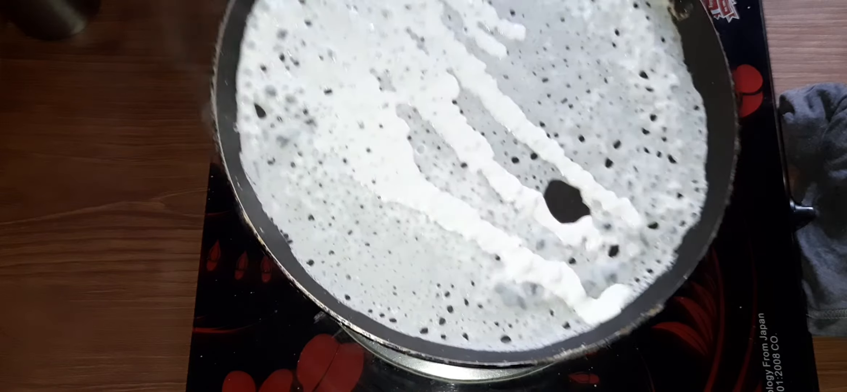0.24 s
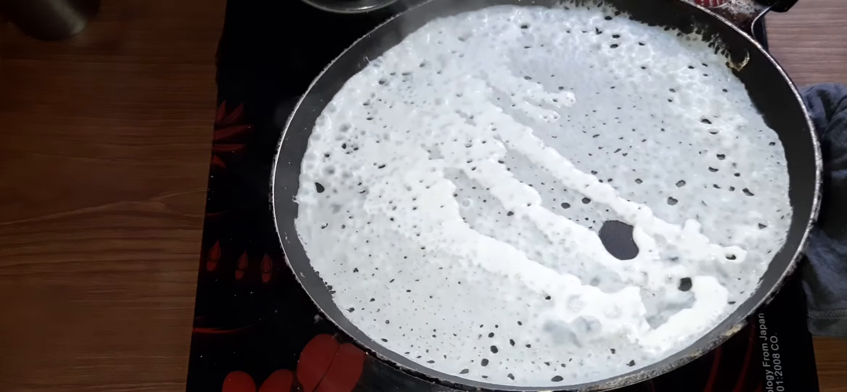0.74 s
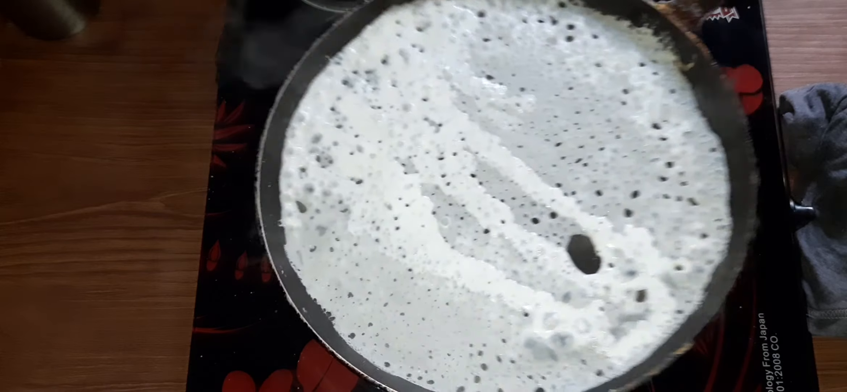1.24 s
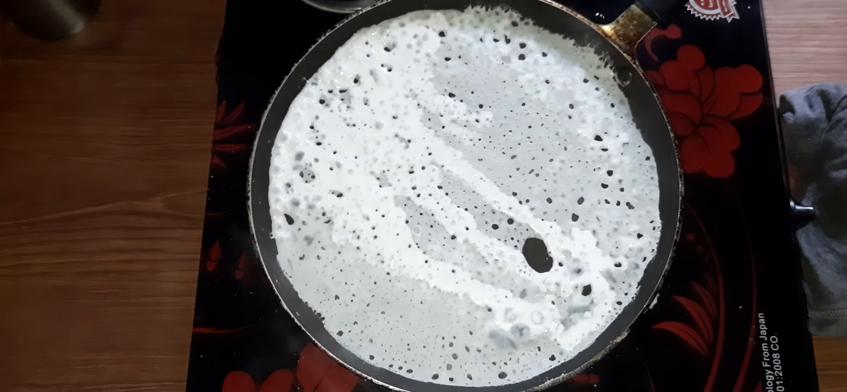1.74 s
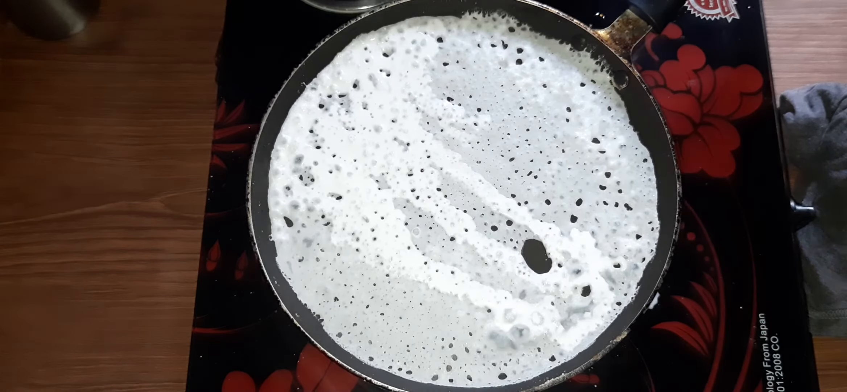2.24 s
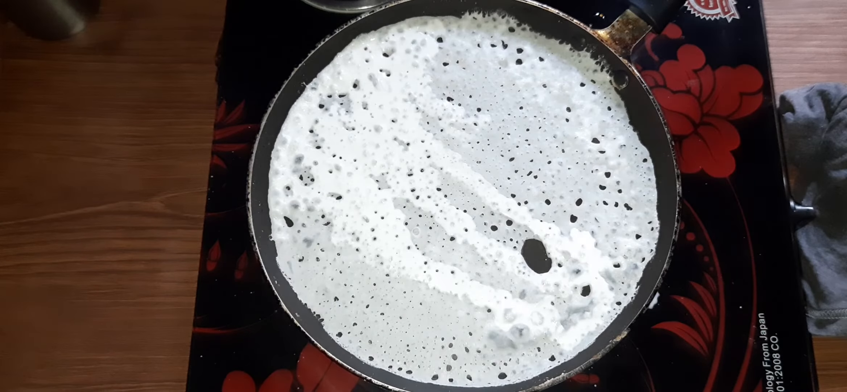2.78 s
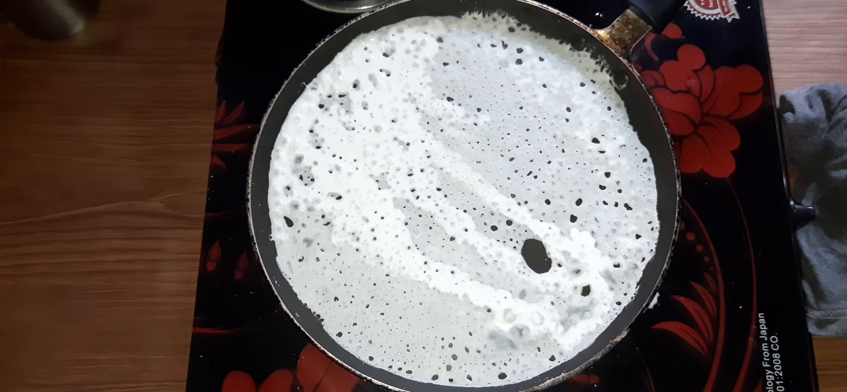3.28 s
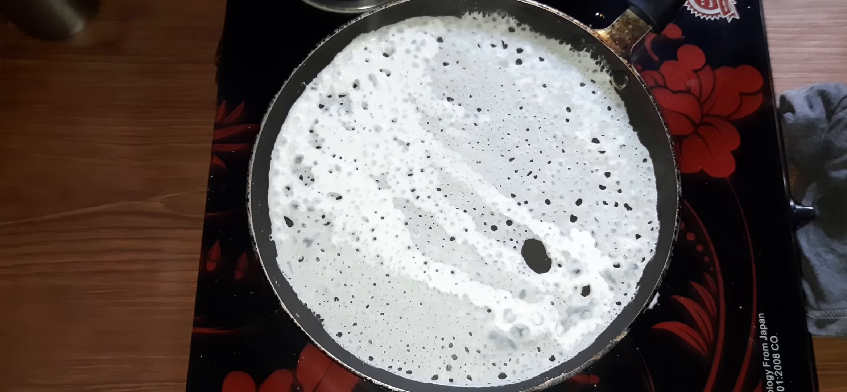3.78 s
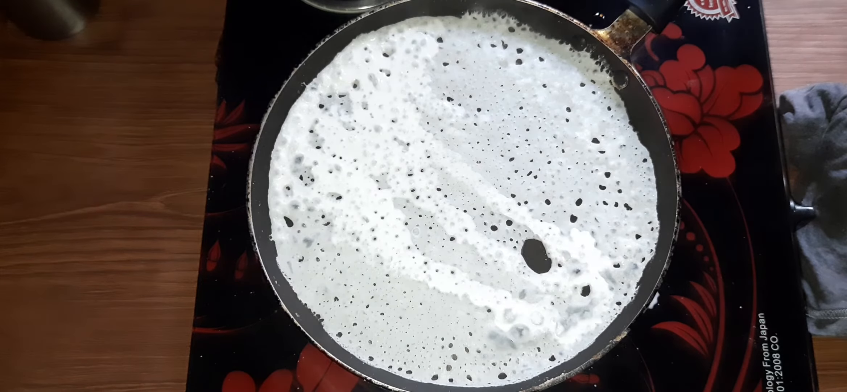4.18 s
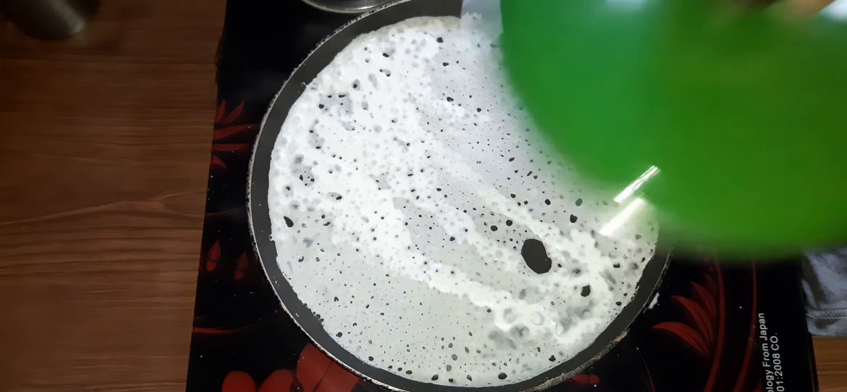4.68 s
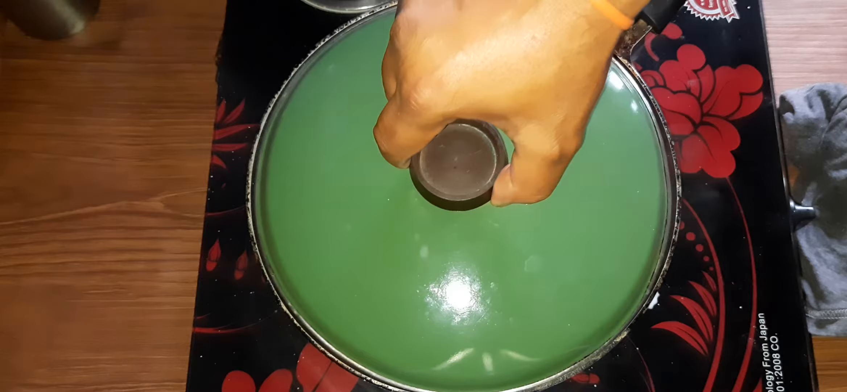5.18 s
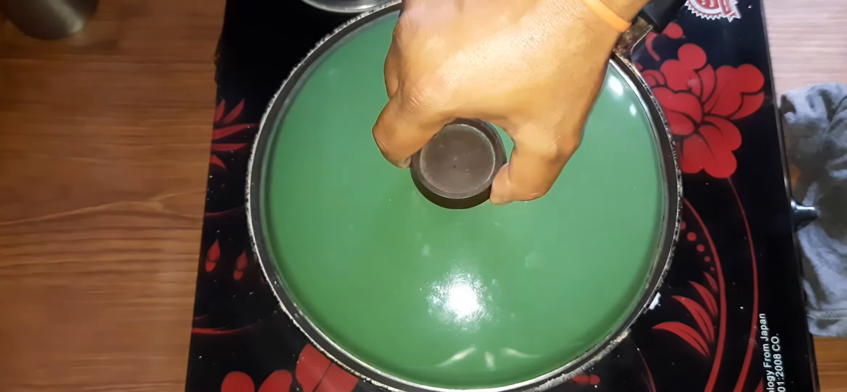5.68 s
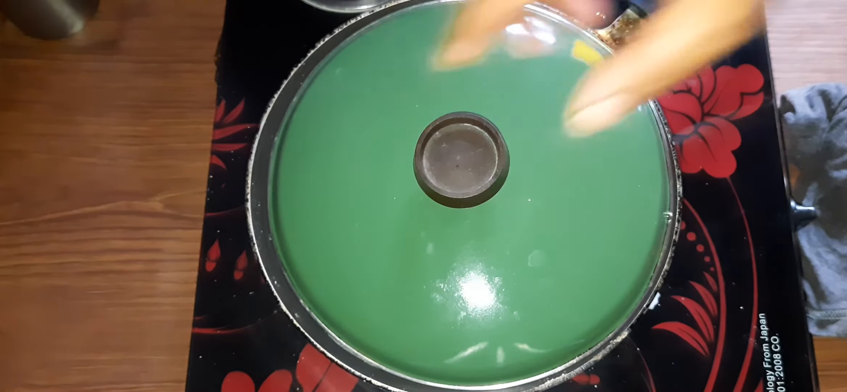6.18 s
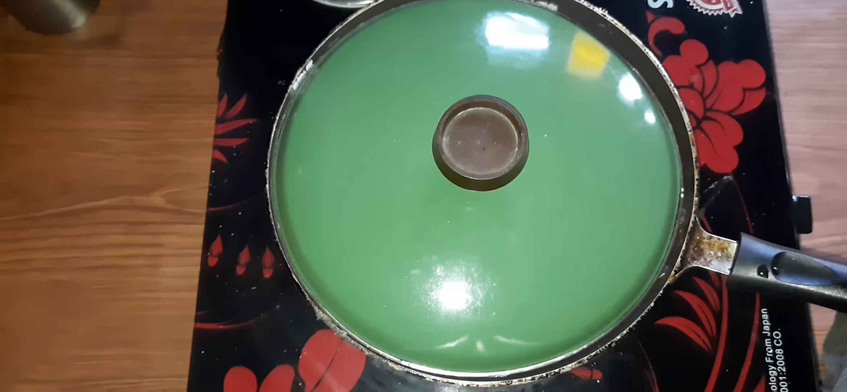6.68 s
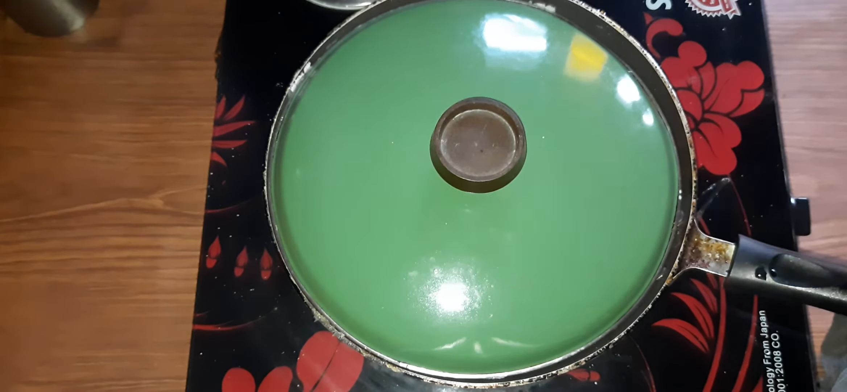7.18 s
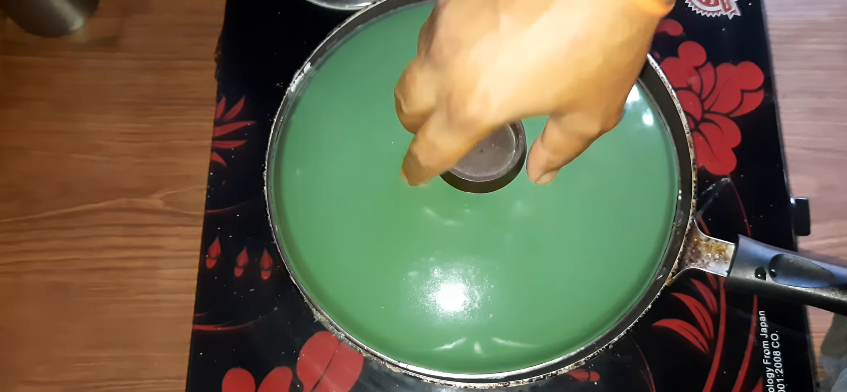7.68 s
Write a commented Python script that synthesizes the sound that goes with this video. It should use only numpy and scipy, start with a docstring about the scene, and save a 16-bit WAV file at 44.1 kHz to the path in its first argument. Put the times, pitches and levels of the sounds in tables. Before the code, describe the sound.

Thin batter sizzles fiercely in a hot pan, close up in a small kitchen, over a low stove hum. The pan clanks down and rocks, metal clinks, and the frying thins, with scattered pops and a dull thud. A metal lid swishes in, then rubs and bumps into place. Drops spit sharply on the hot rim, until the sound cuts abruptly to a faint, hollow simmer.

```python
"""A fierce, close sizzle: countless tiny bubbles burst in thin batter as a hot pan is swirled over a
humming burner in a small kitchen. The pan lands and rocks, metal clinks, something thuds on the
worktop, and the frying thins as the batter dries. A metal lid swishes up, rubs and bumps into place.
Drops from it spit on the hot rim, then abruptly only a muffled, hollow simmer is left."""
import sys
import numpy as np
from scipy import signal
from scipy.fft import rfft, irfft, next_fast_len
from scipy.io import wavfile

SR = 44100
rng = np.random.default_rng(int(sys.argv[2]) if len(sys.argv) > 2 else 0)


def digitize_waveform(pressure):
    """Quantize a signal to 16-bit integers and store it at the path in sys.argv[1].

    Rows of a 2-D input are taken as channels; values are limited to [-1, 1].
    """
    field = np.atleast_2d(pressure).T
    bounded = np.clip(field, -1, 1)
    quanta = np.round(bounded * 32767).astype(np.int16)
    wavfile.write(sys.argv[1], SR, quanta)


N = 349713
TIME = np.arange(N) / SR
SIDES = np.array([[.5], [-.5]])  # splits a left-right difference between the channels

# Table levels are relative: each layer adds its own trim.
# fader ride of the frying, fierce while the pan is swirled: t/s, level/dB
FRYING_RIDE = [(0, -42.5), (0.15, -43), (0.3, -40), (0.6, -43), (1.15, -44.5), (1.45, -51), (2.4, -58),
               (2.68, -60), (2.93, -56), (3.25, -62.5), (3.45, -56.5), (3.95, -60), (4.1, -57), (5.08, -62)]
# EQ of the frying: f/Hz, level/dB
FRYING_EQ = [(180, -47.5), (300, -22), (412, -25), (511, -16), (603, -12.5), (656, -11), (915, -7.5),
             (1150, -6), (1580, -2), (3400, -2), (7570, -1), (9710, -5), (11900, -0.5), (15200, 1),
             (16000, -8.5)]
# crossovers from wet bubbling to crackle, and from crackle to fizz: f/Hz
FRYING_CROSSOVERS = [2500, 5500]
# fizz, crackle, wet bubbling: fresh level/dB, then steps for drying/dB, lid above/dB, lid down/dB
BAND_STAGES = [(0, 0, 0, -12.5), (-6.5, -4, -6, -18), (-6, -12, -3.5, -3.5)]
# stereo lean of every sizzle: f/Hz, left-right/dB
SIZZLE_BALANCE = [(500, -2), (2000, -0.4), (6000, -2.1), (9000, 3), (13000, 5), (16000, 2)]
# the burner's two resonances: f/Hz, width/Hz
BURNER_DRONES = [(69, 22), (118, 12)]
# their fader rides: t/s, low drone/dB, upper drone/dB
BURNER_RIDE = [(0, -57, -56), (0.15, -69.5, -72), (0.45, -53, -59), (1.45, -59, -58), (2.4, -84, -82.5),
               (3.35, -75.5, -78), (4.1, -71, -67.5), (4.6, -81.5, -76), (5.15, -72.5, -67),
               (5.5, -77.5, -61.5), (5.7, -88, -74), (6.35, -69, -71), (6.55, -118, -72), (7.9, -93, -81.5)]
# EQ of the room tone: f/Hz, level/dB
AIR_EQ = [(20, -15.5), (55, 2.5), (150, 5), (280, -2), (450, -6.5), (800, -7.5), (1500, -26.5), (4000, -15),
          (16000, -8.5)]
# how alike left and right are in the room: f/Hz, coherence/0-1
COHERENCE = [(60, 0.8), (250, 0.79), (500, 0.71), (1000, 0.062), (2000, 0), (16000, 0.067)]
# the largest bubbles bursting: t/s, level/dB, centre f/Hz, left-right/dB
BIG_POPS = [(0.7688, -23, 12400, 4), (1.172, -15.5, 13300, 5), (1.3145, -27.5, 5500, -2),
            (1.3528, -33, 13000, 1.5), (1.524, -28.5, 2600, -2), (2.342, -30.5, 12200, 0),
            (2.359, -30.5, 12000, -3), (2.5565, -22.5, 12500, 1), (2.7216, -35.5, 1900, -3),
            (2.8417, -34, 14000, -4), (2.9075, -32, 7850, 1.5), (3.0085, -36.5, 2800, -2),
            (3.329, -36, 8040, -3.5), (3.7987, -34, 5940, 1), (6.1748, -13, 9500, 0),
            (6.5085, -17, 9400, 3), (6.837, -40.5, 9000, -6), (6.9018, -31, 10000, 0),
            (7.2141, -32.5, 12200, -3), (7.888, -32.5, 12900, 0)]

# Struck objects have hits (t/s, level/dB, tilt/dB per octave), an EQ for their noise (f/Hz, level/dB)
# and ringing modes (f/Hz, level/dB, t60/s).
# the pan lands and rocks on the burner
PAN_HITS = [(1.546, -23, 4.5), (1.564, -18.5, 2.4), (1.573, -20, 1), (1.590, -19.5, 0.84),
            (1.612, -29, 3.7), (1.638, -22.5, 0), (1.711, -27, 4), (1.741, -30.5, -0.5), (1.892, -25, 0.2)]
PAN_EQ = [(110, -54), (180, -23.5), (370, -5.5), (490, -12), (584, -3.5), (747, -8.5), (802, -13.5),
          (1010, -13.5), (1380, -14), (1740, -17.5), (2430, -11.5), (3900, -28), (5250, -30), (9720, -47.5),
          (12000, -41), (15600, -68), (22000, -120)]
PAN_RING = [(116, -19, .8), (257, -13, .7), (290, -8, .7), (329, -4, .6), (372, 0, .6), (402, -3, .6),
            (444, -4, .6), (473, -4, .55), (526, 0, .55), (576, -3, .5), (644, -4, .55), (700, -6, .55),
            (790, 0, .45), (820, 0, .45), (1077, -14, .7), (1410, -10, .6), (2213, -9, .5), (2441, -7, .55),
            (2672, -7, .6), (2854, -9, .55), (2886, -10, .55), (3316, -13, .55)]
# bright metal clinks
CLINK_HITS = [(1.926, -29, 10.3), (1.947, -33, 4.9), (2.021, -38.5, 4), (2.095, -42, 4.4),
              (2.115, -42.5, 1.3)]
CLINK_EQ = [(530, -16), (900, -5), (1260, 3.5), (1770, 3.5), (1990, 2), (3380, -5), (5480, -8.5),
            (5960, -15), (8050, -12.5), (15100, -39.5), (16000, -33)]
CLINK_RING = [(1280, -6, .7), (1985, 0, .55), (2004, -1, .55), (2250, -3, .55), (2510, -1, .65),
              (2620, -3, .6), (2988, -5, .5), (4011, -5, .55), (4240, -3, .65), (4856, 4, .35),
              (5330, -1, .35), (5512, 2, .38), (5582, 2, .35), (5690, 0, .38), (6350, -4, .35),
              (6498, -2, .38), (9286, -7, .3)]
# dull, rattling thuds on the worktop
THUD_HITS = [(1.930, -35, -3.5), (3.446, -48.5, -3), (3.457, -40.5, 1), (3.474, -34.5, .5), (3.491, -33, 0),
             (3.513, -37.5, 1.5), (3.546, -39, 2), (3.597, -38, -2)]
THUD_EQ = [(35, -50), (60, -20), (117, -23), (171, -12), (357, -11.5), (531, -19), (683, -10.5), (996, -23),
           (1060, -11), (1650, -15), (2510, -23), (2840, -21), (9000, -44.5), (11700, -69), (19800, -120)]
THUD_RING = [(116, -2, .7), (145, -13, .6), (208, -13, .6), (258, -9, .7), (296, -11, 1.1), (352, -9, .65),
             (419, -8, .5), (630, -12, .5), (690, -11, .5), (791, -12, .5), (942, -10, .45),
             (1058, -10, .42), (1082, -11, .42), (1152, -14, .55), (1254, -9, .48), (1320, -7, .4),
             (1475, -9, .4), (1694, -7, .38), (2046, -9, .35), (2229, -11, .4), (2400, -10, .35),
             (2837, -14, .35)]
# the lid bumps on the pan
LID_HITS = [(5.385, -41, 2), (5.428, -35, -2), (5.447, -46, -7), (5.897, -39, -10), (6.838, -52.5, 8),
            (6.902, -53.5, 5), (7.213, -58, -2), (7.542, -59.5, -9.5)]
LID_EQ = [(88, -49), (150, -22), (284, -18.5), (394, -13), (430, -10), (684, -8.5), (947, -23.5),
          (1280, -24), (1560, -53), (2010, -28.5), (3000, -59), (3900, -98), (6600, -120)]
LID_RING = [(383, -4, 0.34), (536, -8.5, 0.43), (651, -36, 0.41), (746, -27, 0.59), (851, -32, 0.42),
            (1240, -18, 0.22), (1249, -28, 0.55)]

# fader ride of the lid's swish: t/s, level/dB
SWISH_RIDE = [(4.53, -94), (4.58, -54.5), (4.64, -51), (4.69, -59.5), (4.8, -73)]
# EQ of the swish: f/Hz, level/dB
SWISH_EQ = [(150, -19.5), (450, -0.5), (650, -2), (1100, -15), (2000, 1), (3000, -2.5), (3800, 5),
            (5500, -0.5), (9000, -2.5), (16000, -8)]
# the rim rubs on the pan: t/s, level/dB, tilt/dB per octave, swell/s
RIM_RUBS = [(5.25, -76.5, 15.5, 0.017), (5.866, -34.5, 1.5, 0.035)]
# lid modes that sing when rubbed: f/Hz, level/dB, t60/s
RIM_RING = [(283, -18.5, 0.54), (409, -1.5, 0.46), (614, -21.5, 0.29), (683, -17, 0.31), (1960, -24, 0.8),
            (1990, -36.5, .5)]
# EQs of the spitting, the simmer and its hollow rumble: f/Hz, level/dB
SPIT_EQ = [(180, -19.5), (300, -17.5), (405, -24.5), (470, -23.5), (667, -14.5), (900, -11), (1280, -15),
           (1900, -10.5), (4300, -8), (5520, -2), (8220, 0), (10000, -5.5), (12500, 2), (15200, 1),
           (16000, -8)]
SIMMER_EQ = [(500, 1), (800, -5), (1080, 10), (1300, 13.5), (1520, 6), (1850, 3.5), (2300, -2), (3200, -6),
             (4200, -7), (5700, -1.5), (7000, -2.5), (8300, 2.5), (10000, -7.5), (12500, 4.5), (16000, -2)]
RUMBLE_EQ = [(41, -54.5), (70, -30), (92, -39.5), (130, -11), (163, -5), (221, 1), (289, -0.5),
             (356, -16.5), (568, -26), (750, -48.5), (980, -57), (1650, -120)]
# swells of that rumble: t/s, half width/s, rise/dB
RUMBLE_SWELLS = [(6.94, 0.12, 5.5), (7.73, 0.18, 9)]

# the batter dries, the lid is brought over it, the lid is lowered: start/s, length/s
DRYING, LID_ABOVE, LID_DOWN = (2.45, 1.04), (4.75, 0.16), (5.07, 0.3)
SPIT_START_S, SHUT_S = 5.89, 6.758  # spitting starts; hard cut to the simmer


def amp(db):
    """Decibels to gain."""
    return 10 ** (np.asarray(db) / 20)


def unit_rms(x):
    """Scales a sound so that its mid has rms 1."""
    return x / np.sqrt(np.mean(x.mean(0) ** 2) + 1e-20)


def read(points, hz):
    """Reads a table on a log-frequency axis."""
    f, value = np.transpose(points)
    return np.interp(np.log(hz + 1), np.log(f + 1), value)


def ride(rows, column=1):
    """Gain over time from one dB column of a fader ride."""
    rows = np.asarray(rows)
    return amp(np.interp(TIME, rows[:, 0], rows[:, column]))


def ramp(start_s, length_s):
    """Linear fade from 0 to 1."""
    return np.clip((TIME - start_s) / length_s, 0, 1)


def add(mix, s, sound):
    """Mixes a stereo sound in at time s."""
    part = mix[:, round(s * SR):][:, :sound.shape[1]]
    part += sound[:, :part.shape[1]]


def filtered(x, gain):
    """Applies gain(Hz) to each channel."""
    size = next_fast_len(x.shape[1], True)
    return irfft(rfft(x, size) * gain(np.fft.rfftfreq(size, 1 / SR)), size)[:, :x.shape[1]]


def peak(hz, centre, width):
    """Resonance curve; a low-pass when centred on 0."""
    return 1 / (1 + ((hz - centre) / width) ** 2)


def diffuse(gain, size=N):
    """Coloured noise from all round: centred in the bass, wide in the treble."""
    mid, side = rng.standard_normal((2, 1, size))
    mid = filtered(mid, lambda hz: gain(hz) * np.sqrt(1 + read(COHERENCE, hz)))
    side = filtered(side, lambda hz: gain(hz) * np.sqrt(1 - read(COHERENCE, hz)))
    return unit_rms(mid + 2 * SIDES * side)


def wander(rate_hz):
    """Smooth random modulation of rms 1."""
    return unit_rms(filtered(rng.standard_normal((1, N)), lambda hz: peak(hz, 0, rate_hz)))[0]


def bubble_band(hz, centre, octaves):
    """The broad spectrum of one bursting bubble."""
    return peak(np.log2((hz + 1) / centre), 0, octaves)


def pan_echoes(near_db=0, near_s=0.0055, room_db=-5, room_t60=.36):
    """Impulse response from a random spot on the pan: direct click, pan and worktop echoes, room."""
    t = np.arange(SR // 4) / SR
    near = rng.standard_normal((2, len(t))) * (rng.random((2, len(t))) < .15) * np.exp(-t / near_s)
    room = rng.standard_normal((2, len(t))) * amp(-60 * t / room_t60)
    taps = sum(amp(db) * x / np.linalg.norm(x[0]) for db, x in [(near_db, near), (room_db, room)])
    taps = np.pad(taps, ((0, 0), (72, 0)))
    taps[[0, 1], [64, 64 + rng.integers(-5, 5)]] += 1  # direct click, placed by a tiny delay
    return taps


def sizzle(eq, per_s, spread_db, hiss_db, clump_db, bands=16):
    """Countless tiny bubbles burst in clumps, each size in its own band, over a hiss of steam."""
    centres = np.geomspace(1200, 15000, bands)
    count = int(np.ceil(per_s * N / SR / bands))
    clumps, bubbles = amp(clump_db * wander(22)), np.zeros((2, N))
    for centre in centres:
        onsets = rng.integers(0, N, count)
        sizes = amp(spread_db * np.minimum(rng.exponential(1, count), 5.2))
        clicks = np.bincount(onsets, sizes * rng.choice([-1, 1], count), N)
        burst = filtered(pan_echoes(), lambda hz: bubble_band(hz, centre, .86)
                         / np.linalg.norm(bubble_band(hz, centres[:, None], .8), axis=0))
        bubbles += signal.oaconvolve(clicks[None], burst, axes=1)[:, :N]
    hiss = amp(hiss_db) * unit_rms(rng.standard_normal((2, N)))
    blend = clumps * (unit_rms(bubbles) + hiss) / np.hypot(1, amp(hiss_db))
    return unit_rms(filtered(blend, lambda hz: amp(read(eq, hz) + SIDES * read(SIZZLE_BALANCE, hz))))


def frying_gains():
    """Gains of fizz, crackle and wet bubbling: drying takes the wet first, the lid dulls all three."""
    stages = np.array([np.ones(N), ramp(*DRYING), ramp(*LID_ABOVE), ramp(*LID_DOWN)])
    return ride(FRYING_RIDE) * amp(np.array(BAND_STAGES) @ stages)


def frying(gap_hz=6200, gap_width_hz=260, gap_db=6, steam_db=5):
    """The batter fries in three bands; as the lid comes down, the gap under it rings."""
    fresh = np.clip(1.4 - TIME, 0, 1)  # fresh batter steams in a finer, more even hiss
    fry = sizzle(FRYING_EQ, per_s=3000, spread_db=4, hiss_db=-6 + steam_db * fresh, clump_db=.5)
    gap = amp(gap_db) * ramp(*LID_DOWN) * filtered(fry, lambda hz: peak(hz, gap_hz, gap_width_hz) ** 2)
    wet, body = (filtered(fry, lambda hz: 1 / (1 + (hz / edge) ** 20)) for edge in FRYING_CROSSOVERS)
    fizz, crackle = fry - body + gap, body - wet
    return sum(unit_rms(band) * gain for band, gain in zip([fizz, crackle, wet], frying_gains()))


def burner(trim_db=-1, flutter=.25, waver=.1, air_db=-70.5):
    """The stove hums in two low, wavering drones over a bed of room tone."""
    out = amp(air_db) * diffuse(lambda hz: amp(read(AIR_EQ, hz)))
    for column, (centre, width) in enumerate(BURNER_DRONES, 1):
        pitch_hz = centre + width * waver * wander(3.9)
        tone = np.sin(2 * np.pi * np.cumsum(pitch_hz) / SR)
        rumble = diffuse(lambda hz: peak(hz, centre, width) ** 2)
        out += unit_rms(tone + flutter * rumble) * amp(trim_db) * ride(BURNER_RIDE, column)
    return out


def stray_pops(count=120, per_s=8.8, lift_db=15, spread_db=3, centre_hz=12300):
    """Rows like BIG_POPS for smaller, random bubbles that ride on the level of fizz and spitting."""
    bed_db = 20 * np.log10(frying_gains()[0] + spitting_gain())
    times = np.cumsum(rng.exponential(1, count)) / per_s
    return [(s, bed_db[int(s * SR)] + lift_db + spread_db * size, centre_hz * 2 ** (.3 * pitch), 3 * side)
            for s, (size, pitch, side) in zip(times, rng.standard_normal((count, 3))) if .01 < s < SHUT_S]


def pops(trim_db=8):
    """Single bubbles crack one by one, each with a brief spray."""
    out = np.zeros((2, N))
    for s, db, balance_db, centre in [(s, db, lr, hz) for s, db, hz, lr in BIG_POPS + stray_pops()]:
        echoes = pan_echoes(near_db=3, near_s=.002, room_db=-3)
        pop = filtered(echoes, lambda hz: bubble_band(hz, centre, octaves=1.3))
        add(out, s - .001, amp(db + trim_db + SIDES * balance_db) * pop / np.linalg.norm(pop.mean(0)))
    return out


def strike(hits, eq, modes, ring_db, crack_db, crack_s, bass_t60, treble_t60, rise_s):
    """Each hit is a short crack, a dense tail with separate bass and treble decays, and ringing modes."""
    out, t = np.zeros((2, N)), np.arange(SR) / SR
    mode_hz, mode_db, mode_t60 = np.transpose(modes)[:, :, None, None]
    decays = amp(mode_db - 60 * t / np.minimum(mode_t60, 1))  # t60 capped at 1 s
    stereo_angle = np.arccos(read(COHERENCE, mode_hz))
    for s, db, tilt_db in hits:
        noise = diffuse(lambda hz: amp(read(eq, hz) + tilt_db * np.log2(hz / 1000 + .069)), size=SR)
        bass = filtered(noise, lambda hz: peak(hz, 0, 1000))
        tail = bass * amp(-60 * t / bass_t60) + (noise - bass) * amp(-60 * t / treble_t60)
        crack = amp(crack_db) * noise * np.exp(-t / crack_s)
        phase = 2 * np.pi * rng.random(mode_hz.shape)
        phase = phase + SIDES * stereo_angle * rng.choice([-1, 1], mode_hz.shape)
        ring = (decays * np.sin(2 * np.pi * mode_hz * t + phase)).sum(0)
        ring *= amp(ring_db) / np.linalg.norm(amp(mode_db))
        add(out, s, amp(db) * (crack + .5 * tail + ring) * (1 - np.exp(-t / rise_s)))
    return out


def pan_landing():
    """The pan clanks onto the burner and rocks, ringing in the low mids."""
    return amp(-1.15) * strike(PAN_HITS, PAN_EQ, PAN_RING, ring_db=-1.5, crack_db=-2, crack_s=.0072,
                               bass_t60=.64, treble_t60=.38, rise_s=.00075)


def clinks():
    """Light hits on metal: a sharp attack and a bright ring."""
    return amp(-6) * strike(CLINK_HITS, CLINK_EQ, CLINK_RING, ring_db=2.5, crack_db=6, crack_s=.013,
                            bass_t60=.87, treble_t60=.72, rise_s=.00023)


def thuds():
    """Soft-edged, rattling hits boom through the worktop."""
    return amp(1.5) * strike(THUD_HITS, THUD_EQ, THUD_RING, ring_db=-1.5, crack_db=-15, crack_s=.012,
                             bass_t60=.5, treble_t60=.36, rise_s=.004)


def lid_swish():
    """A breath of noise as the lid is picked up."""
    gate = (TIME > SWISH_RIDE[0][0]) & (TIME < SWISH_RIDE[-1][0])
    return diffuse(lambda hz: amp(read(SWISH_EQ, hz))) * ride(SWISH_RIDE) * gate


def rim_rubs(grit=.39, grit_width_hz=55):
    """The lid's modes swell and ring unevenly where its rim slides on the pan."""
    out, t = np.zeros((2, N)), np.arange(SR) / SR
    for s, db, tilt_db, swell_s in RIM_RUBS:
        for hz, mode_db, t60 in RIM_RING:
            attack = np.minimum(t / swell_s, 1) ** 2
            decay = amp(db + mode_db - 60 * np.maximum(t - swell_s, 0) / t60)
            scrape = diffuse(lambda f: peak(f, hz, grit_width_hz), size=SR)
            tone = np.sin(2 * np.pi * hz * (t + SIDES * .0004))
            add(out, s, amp(tilt_db * np.log2(hz / 400)) * attack * decay * (tone + grit * scrape))
    return out


def lid_bumps():
    """The lid, held by its knob, knocks on the pan; its treble dies at once."""
    return strike(LID_HITS, LID_EQ, LID_RING, ring_db=-7.5, crack_db=-19.5, crack_s=.0015,
                  bass_t60=.38, treble_t60=.078, rise_s=.00023)


def spitting_gain(full_db=-40, build_db=4.5, build_s=.19, flare_db=-28.5, flare_s=.08):
    """The spitting builds up, flares after each big pop and stops dead."""
    flares = sum(amp(db) * (TIME > s) * np.exp(-abs(TIME - s) / flare_s)
                 for s, db, _, _ in BIG_POPS if SPIT_START_S < s < SHUT_S)
    steady = amp(full_db + build_db * (ramp(SPIT_START_S, build_s) - 1))
    gate = ramp(SPIT_START_S, .032) * (1 - ramp(SHUT_S, .002))
    return gate * (steady + amp(flare_db) * flares)


def spitting():
    """Drops from the lid spit on the hot rim."""
    return sizzle(SPIT_EQ, per_s=3500, spread_db=3, hiss_db=-6.5, clump_db=.1) * spitting_gain()


def simmer(start_db=-60, settle_db=2, settle_s=.99, rumble_db=-68):
    """The shut pan bubbles and settles a little, over a hollow rumble that swells twice."""
    bubbles = sizzle(SIMMER_EQ, per_s=5900, spread_db=1.5, hiss_db=-6.5, clump_db=.7)
    bubbles *= amp(start_db - settle_db * ramp(SHUT_S, settle_s))
    swells_db = sum(db * np.exp(-((TIME - s) / width) ** 2) for s, width, db in RUMBLE_SWELLS)
    rumble = diffuse(lambda hz: amp(read(RUMBLE_EQ, hz))) * amp(rumble_db + swells_db)
    return ramp(SHUT_S, .002) * (bubbles + rumble)


def scene():
    """The full stereo mix at the stove."""
    bed = frying() + burner() + pops()
    knocks = (pan_landing() + clinks() + thuds()) * amp(SIDES * -1.5)  # a touch to the right
    lid = lid_swish() + rim_rubs() + lid_bumps()
    return bed + knocks + lid + spitting() + simmer()


def record(dry, cutoff_hz=16000):
    """A steep low-pass takes the very top off the mix."""
    lowpass = signal.firwin(511, cutoff_hz, window=("kaiser", 9), fs=SR)
    return signal.oaconvolve(dry, lowpass[None], "same")


dry = scene()
out = record(dry)
digitize_waveform(out)
```